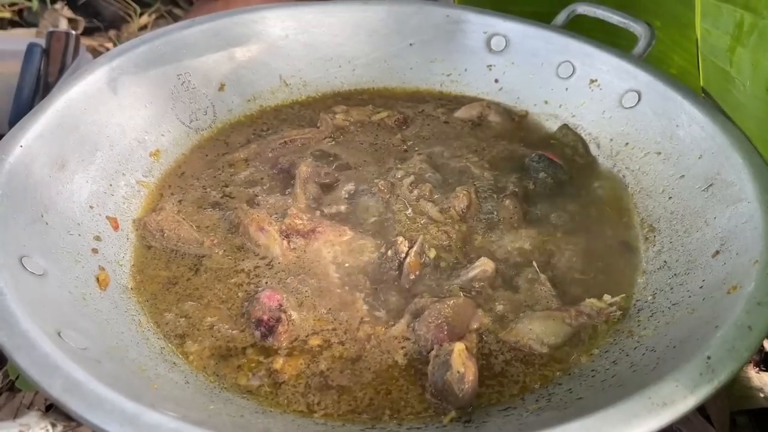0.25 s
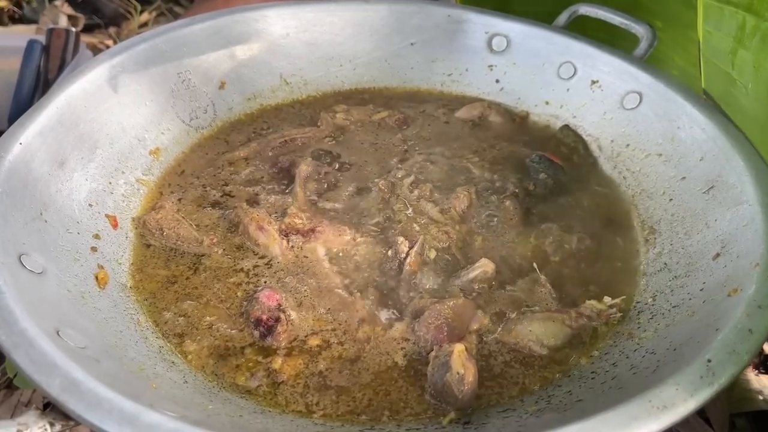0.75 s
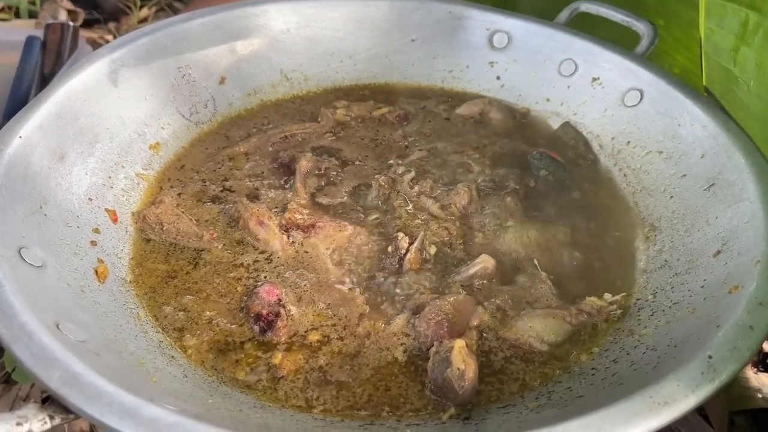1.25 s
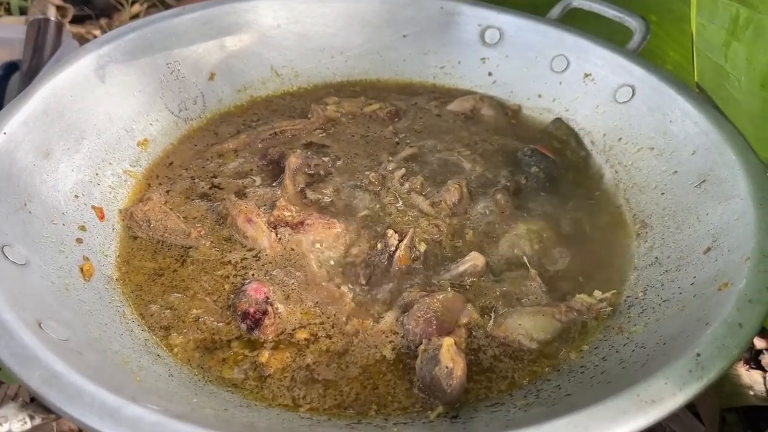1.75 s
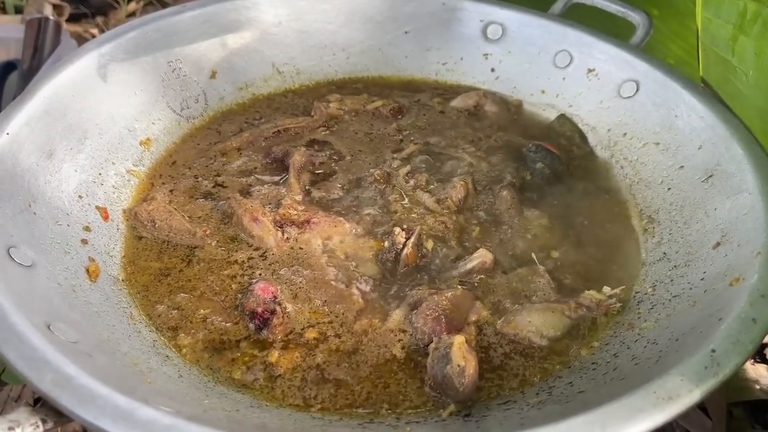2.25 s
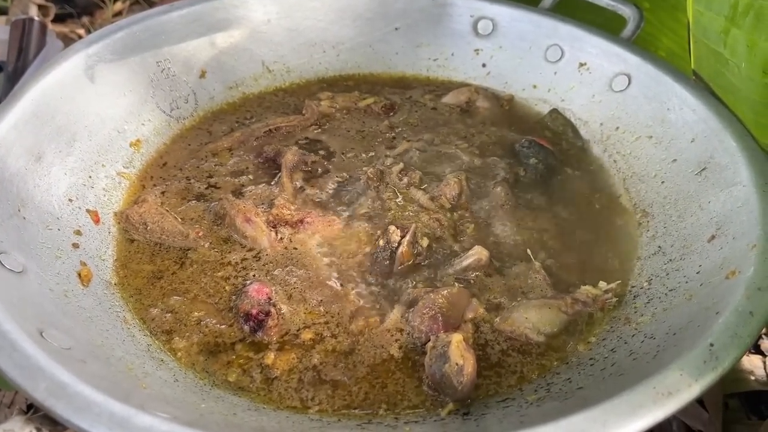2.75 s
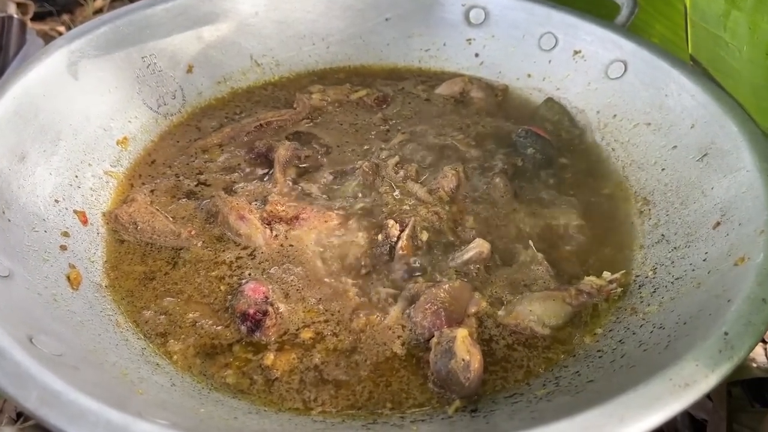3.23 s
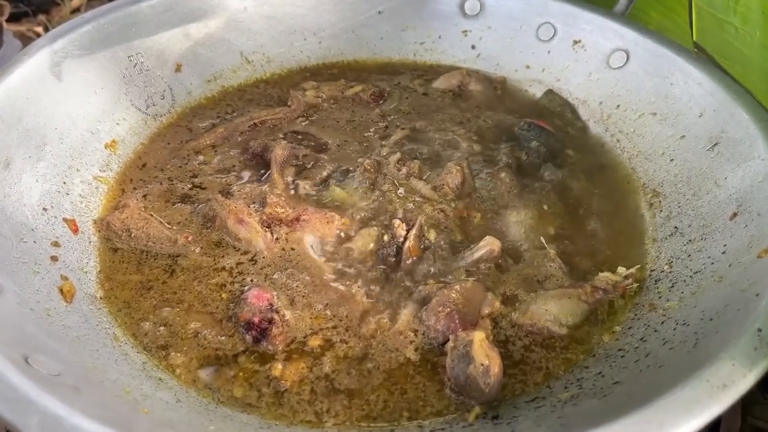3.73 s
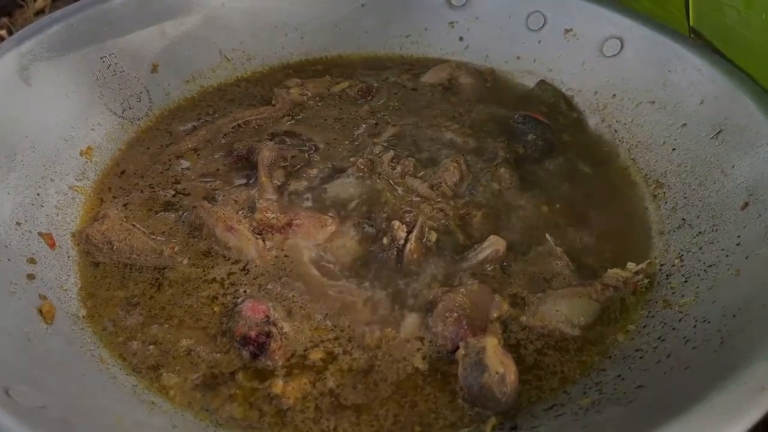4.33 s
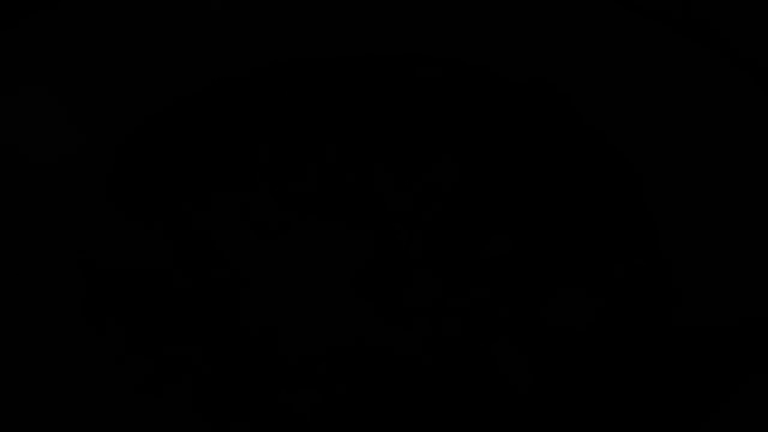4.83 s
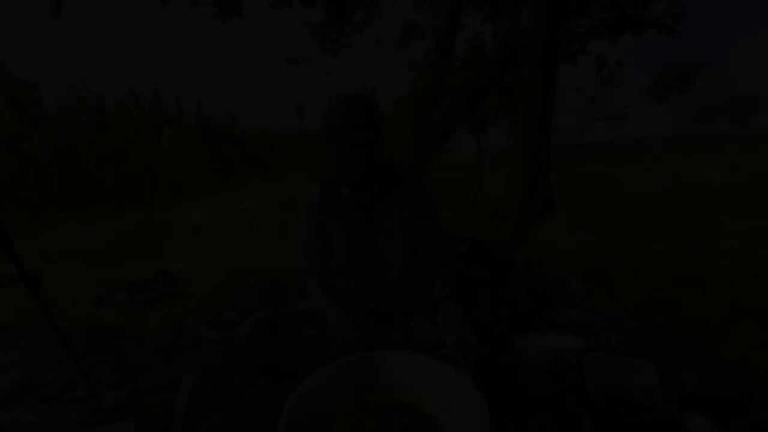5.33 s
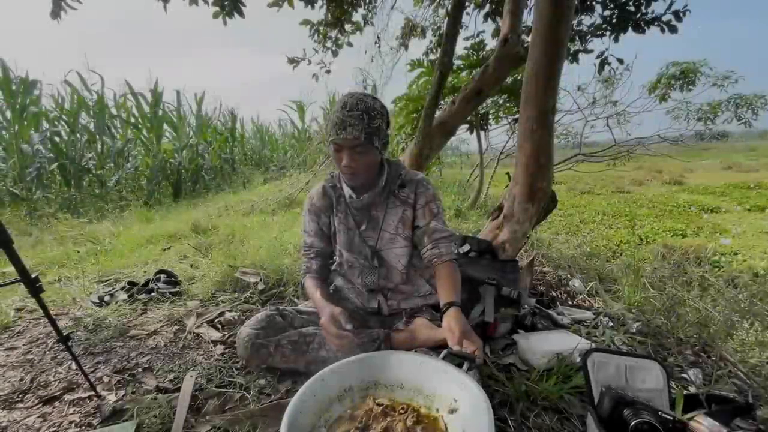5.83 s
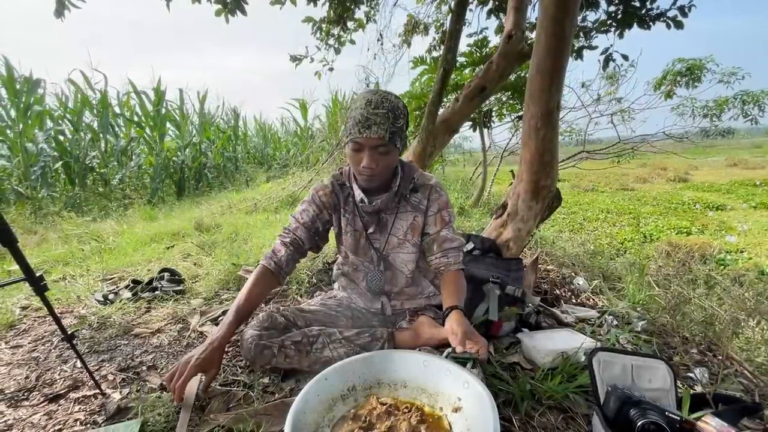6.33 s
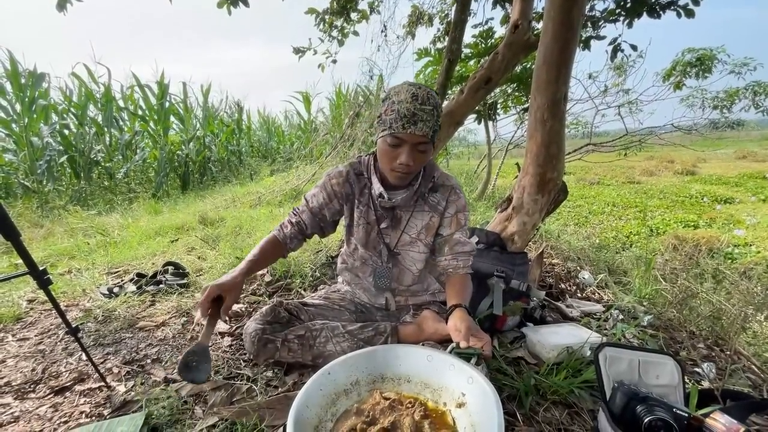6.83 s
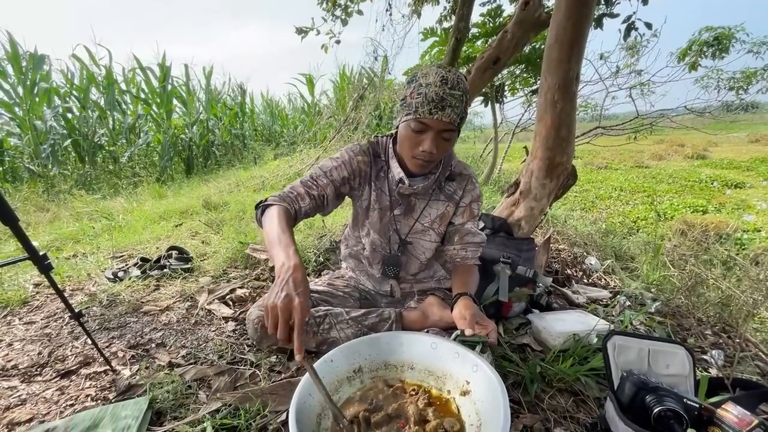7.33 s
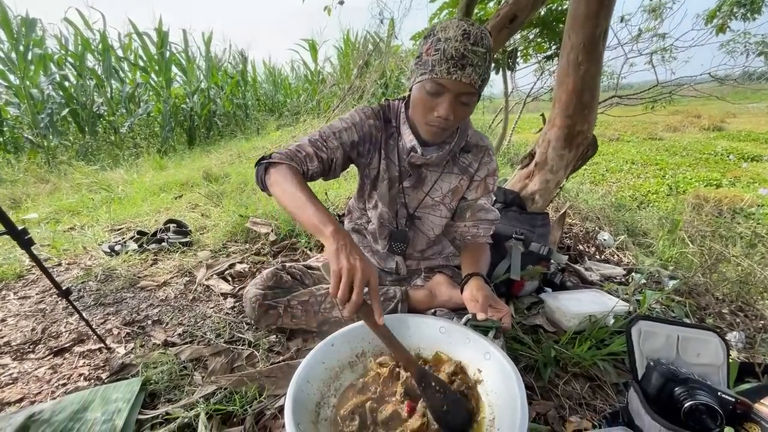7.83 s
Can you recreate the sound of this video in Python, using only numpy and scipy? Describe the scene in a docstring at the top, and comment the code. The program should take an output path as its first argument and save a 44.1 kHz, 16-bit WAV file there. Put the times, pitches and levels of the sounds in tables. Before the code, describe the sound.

Close bubbling and fat spitting in a wok over hissing gas with insects buzzing, fading to a wider simmer, spatula knocks and wet stirring.

```python
"""Close above a metal wok on a gas burner at a field edge: a steam pocket hums in throbs under the meat, fat
spits as short rising tones with torn noise, bubbles burst, and insects buzz in the grass (narrow noise, wing pulses).
At 1.4 s one big bubble thumps the pan in jolts that ring its modes. From 4 to 6 s the close place fades over to one
further off: a lower flame, and simmering made of ringing grains over a soft wash. At 7.25 s a spatula knocks the
wok (damped modes and clicks), then stirs: wet grains and resonant scraping. A lower insect rasps meanwhile."""
import sys
import numpy as np
from scipy import signal
from scipy.fft import rfft, irfft, next_fast_len
from scipy.io import wavfile

SR = 44100
rng = np.random.default_rng(int(sys.argv[2]) if len(sys.argv) > 2 else 0)


def wrap_up_sound(samples):
    """Save the sound to the file named by the first command line argument, as 16-bit audio."""
    columns = np.atleast_2d(samples).T
    # keep every value between -1 and 1, then stretch to whole-number steps
    tamed = np.clip(columns, -1, 1)
    steps = np.round(tamed * 32767).astype(np.int16)
    wavfile.write(sys.argv[1], SR, steps)


N = 356283
TIME = np.arange(N) / SR
SIZE = next_fast_len(N + 8192)
FREQS = np.maximum(np.arange(SIZE // 2 + 1) * SR / SIZE, 1)

# All levels below are relative: the sources add their own balance and pan.
# far insect chorus: (frequency [Hz], level [dB per Hz])
CHORUS_SPECTRUM = [(7200, -105), (8400, -93), (9150, -73), (9500, -81.5), (10050, -70.5), (10600, -80.5),
                   (11300, -81.5), (12000, -103.5), (12700, -118)]
# near insect, about one call a second: (time of breaking off [s], level [dB])
NEAR_CALLS = [(.91, -43.5), (2.08, -42.5), (3.2, -43.5), (4.34, -43), (5.3, -47.5), (6.41, -40),
              (7.59, -39), (8.6, -38)]
# second, lower insect: (middle time [s], length [s])
RASP_TIMES = [(7.357, 0.33), (7.66, 0.26), (7.98, 0.34)]
# smooth hiss of gas and steam: (frequency [Hz], level [dB per Hz])
HISS_SPECTRUM = [(500, -100), (1100, -92.5), (1550, -89), (2100, -92), (2850, -85.5), (3800, -93.5),
                 (5500, -92), (7000, -91.5), (9000, -91), (11800, -99), (12600, -118), (15700, -138)]
# flame and the wash of the boil, at the close and the far place: (frequency [Hz], level [dB per Hz])
CLOSE_FLAME_SPECTRUM = [(20, -104), (45, -65), (70, -58), (110, -60.5), (190, -69), (320, -73),
                        (520, -81.5), (900, -99), (2000, -104)]
FAR_FLAME_SPECTRUM = [(20, -88), (35, -65.5), (54, -52.5), (100, -59.5), (135, -72), (260, -72), (420, -82),
                      (900, -85), (2000, -124.5)]
# small bubbles, heard from further off: (frequency [Hz], level [dB per Hz])
SIMMER_SPECTRUM = [(300, -94), (480, -78), (720, -73.5), (1250, -82), (1650, -75), (2150, -81.5),
                   (2900, -77), (3600, -76), (5400, -76.5), (6600, -100), (8000, -77.5), (12000, -114)]
# frying fat, close: (frequency [Hz], level [dB per Hz])
SIZZLE_SPECTRUM = [(1500, -102), (3500, -93), (5200, -89.5), (6800, -87), (8000, -82), (9400, -81.5),
                   (11200, -80), (12300, -85.5), (13200, -101), (15700, -99)]
# steam pocket, throbbing faster as it shrinks and slower as it refills:
# (time [s], throb rate [per s], level [dB], pitch [Hz])
POCKET_THROBS = [(0.0, 15.35, -26.6, 108), (0.32, 26.16, -28.0, 132), (0.42, 29.11, -33.4, 138),
                 (0.62, 22.93, -29.5, 114), (1.0, 22.88, -30.1, 128), (1.33, 20.34, -29.7, 122),
                 (1.55, 12.25, -41.0, 115), (1.72, 10.72, -27.2, 107), (2.06, 15.6, -28.0, 112),
                 (2.42, 19.91, -24.6, 117), (2.68, 25.87, -26.8, 133), (2.77, 24.75, -31.0, 134),
                 (2.92, 21.23, -30.0, 116), (3.08, 21.46, -25.3, 124), (3.3, 27.84, -26.2, 135),
                 (3.55, 29.19, -28.2, 136), (3.75, 32.67, -31.3, 141), (3.88, 28.13, -28.4, 118),
                 (4.06, 19.72, -35.0, 110), (4.2, 20.18, -28.7, 123), (4.54, 17.24, -29.0, 124),
                 (4.72, 15.63, -41.0, 124)]
# droplets of fat spitting: (time [s], level [dB], pitch [Hz], top of the tearing sound [Hz])
FAT_SPITS = [(.020, -31, 8700, 10000), (.152, -36, 7400, 9400), (.357, -26.5, 8040, 10600),
             (.590, -17, 9900, 11700), (.707, -25, 8200, 10200), (.970, -32, 8500, 9700),
             (1.068, -28, 8500, 10000), (1.200, -31, 7700, 9400), (1.568, -25, 8900, 10300),
             (1.598, -29, 7360, 9600), (1.652, -33, 7170, 9400), (1.854, -30, 7960, 10200),
             (2.111, -30.5, 8400, 10200), (2.434, -28.5, 7550, 9800), (2.527, -27.5, 7800, 9550),
             (2.707, -26, 8500, 9700), (2.783, -22, 9300, 11000), (3.021, -31, 8300, 9900),
             (3.173, -22.5, 8900, 10600), (3.217, -31, 7800, 9500), (3.511, -27, 7900, 9800),
             (3.529, -30, 6500, 9400), (3.620, -30, 7360, 10000), (3.978, -30, 9400, 10400),
             (4.243, -20, 8600, 10400), (4.3765, -26, 8800, 10200), (4.777, -29, 8060, 10000),
             (4.844, -31, 8800, 10000), (5.034, -31.5, 8400, 9700), (5.064, -28.5, 8350, 9300),
             (5.307, -31, 8050, 9100)]
# bubbles bursting at the surface: (time [s], level [dB], pitch [Hz], top of the tearing sound [Hz])
SURFACE_BUBBLES = [(.200, -36, 910, 2000), (.212, -31.5, 1490, 2600), (.287, -39, 795, 2000),
                   (.368, -37.5, 940, 1600), (.476, -23.5, 496, 2900), (.603, -28.5, 764, 2600),
                   (.702, -32.5, 2920, 4470), (.861, -28.5, 620, 1100), (.875, -25.5, 1570, 3420),
                   (.897, -28.5, 2720, 7000), (.922, -41.5, 620, 1000), (.947, -42, 540, 900),
                   (.991, -27.5, 3100, 3780), (1.099, -40, 614, 1300), (1.113, -31.5, 530, 1100),
                   (1.311, -30, 541, 1700), (1.322, -30, 616, 1300), (1.338, -31, 1050, 1600),
                   (1.356, -33, 700, 1700), (1.4252, -12.5, 2740, 3220), (1.613, -31.5, 700, 1800),
                   (1.641, -30, 2760, 4200), (1.724, -36.5, 2420, 3400), (1.851, -32, 517, 2400),
                   (1.929, -33, 2380, 3100), (2.004, -38.5, 780, 1900), (2.190, -37, 517, 1200),
                   (2.408, -33, 517, 1500), (2.826, -40, 520, 1200), (2.907, -29, 527, 1690),
                   (3.118, -37, 650, 1900), (3.218, -31, 520, 1800), (3.420, -37.5, 756, 2300),
                   (3.493, -27, 2620, 3590), (3.815, -37.5, 565, 1500), (3.943, -29.5, 540, 2400),
                   (3.966, -24, 503, 2600), (3.968, -33, 1100, 2200), (4.074, -32, 607, 2300),
                   (4.429, -31, 550, 2200), (4.519, -32, 3960, 4800), (5.085, -31, 480, 900),
                   (5.243, -30.5, 1570, 2190), (5.325, -29, 860, 1990), (5.378, -37, 754, 1700),
                   (5.482, -33, 860, 2500), (5.599, -37, 888, 1900), (5.644, -26.5, 1630, 2720),
                   (5.701, -28.5, 930, 2800), (5.768, -29.5, 527, 3000), (5.874, -26, 1740, 3300),
                   (5.875, -22, 895, 2000), (5.906, -28.5, 2750, 3500), (5.924, -29, 3700, 6000),
                   (6.000, -34, 640, 2200), (6.043, -35, 711, 1400), (6.091, -33, 1720, 2600),
                   (6.117, -40, 700, 1600), (6.129, -27.5, 910, 4200), (6.166, -35, 716, 2000),
                   (6.190, -31.5, 685, 1600), (6.218, -32, 840, 1500), (6.234, -29.5, 805, 1700),
                   (6.279, -29, 1630, 3000), (6.358, -27, 690, 2800), (6.381, -33, 912, 1600),
                   (6.408, -31, 1840, 2390), (6.491, -29.5, 655, 1100), (6.510, -29, 834, 2200),
                   (6.541, -27.5, 896, 3000), (6.552, -26, 1650, 2620), (6.604, -35, 1750, 2400),
                   (6.655, -36, 635, 2200), (6.733, -26.5, 540, 3200), (6.749, -26.5, 850, 2920),
                   (6.795, -34, 710, 1500), (6.834, -33, 840, 2500), (6.857, -36, 800, 2400),
                   (6.957, -28, 786, 1500), (6.969, -28.5, 1000, 5030), (7.0885, -19, 2900, 3200),
                   (7.109, -34, 1930, 2500), (7.145, -27.5, 1800, 2330), (7.173, -31, 1560, 2600),
                   (7.208, -26.5, 750, 1400), (7.317, -25.5, 550, 2000), (7.319, -25, 1440, 1900),
                   (7.418, -28.5, 590, 3000), (7.438, -29, 1550, 2300), (7.552, -30.5, 1000, 2000),
                   (7.628, -27.5, 960, 1600), (7.654, -31, 1000, 2200), (7.661, -29, 2360, 2700),
                   (7.673, -35, 1600, 2160), (7.708, -37, 880, 2000), (7.762, -28, 1110, 2000),
                   (7.788, -26, 1800, 2300), (7.802, -29, 1780, 2300), (7.833, -32, 900, 2400),
                   (7.880, -23, 890, 1150), (7.929, -33.5, 750, 2000)]
# big steam bubble collapsing against the pan in jolts:
# (time [s], body level [dB], crack level [dB], crack top [Hz], left over right [dB], slap level [dB])
COLLAPSE_JOLTS = [(1.4252, -15.5, -16, 7000, 15, -19), (1.4308, -6.5, -8.5, 11500, 4, -13),
                  (1.4430, -13.5, -16.5, 8200, 9, -21), (1.465, -37, -31, 6000, 4, -26),
                  (1.5238, -24, -24, 5870, 7.5, -32)]
# modes of the filled wok, struck from within: (frequency [Hz], level [dB], 60 dB decay time [s])
WOK_MODES = [(114.5, -8.5, 0.22), (176, -15, 0.12), (216, -10, 0.18), (265.6, -4, 0.17), (330, 3, 0.043),
             (449, -0.5, 0.085), (531, -7, 0.11), (622, -12.5, 0.093), (680, -25, 0.051), (812, -12, 0.067),
             (920, -15, 0.06), (1020, -20, 0.032), (1210, -20.5, 0.11), (1440, -33, .06), (1850, -23, 0.07),
             (2075, -18, 0.075), (2310, -21, 0.07), (2600, -14, .045), (3310, -38, 0.092),
             (4200, -37, 0.09), (4610, -33, .1), (5560, -34, 0.12), (5750, -36, .13), (6900, -33, .13)]
# two knocks on the side of the wok, each with a soft bounce:
# (time [s], level [dB], frequency above which the contact dulls [Hz])
SPATULA_KNOCKS = [(7.2496, -18, 4350), (7.2522, -22, 1200), (7.3723, -24, 1500), (7.3748, -22.5, 480)]
# spatula and wall ringing together: (frequency [Hz], level [dB], 60 dB decay time [s])
SPATULA_MODES = [(209, -12, 0.072), (397, -0.5, 0.044), (407, -19, 0.23), (476, -3, 0.046), (763, 1, 0.027),
                 (832, -16, 0.12), (852, -8, 0.016), (910, -2, 0.037), (1050, -12, 0.02), (1342, -34, 0.11),
                 (1615, -17, 0.12), (1750, -8, 0.048), (1815, -10.5, 0.08), (2460, 0.5, 0.032),
                 (2830, -3.5, 0.026), (4540, -2.5, 0.051), (4830, 1, 0.039), (5500, 7, 0.022)]
# wet meat pushed aside: (frequency [Hz], level [dB per Hz])
SLOSH_SPECTRUM = [(250, -67), (600, -69), (950, -76), (1300, -92), (1780, -68.5), (2100, -79), (3000, -77),
                  (4600, -81), (6800, -82), (8100, -89), (9500, -90), (12000, -106)]
# resonances of the scraping blade: (frequency [Hz], width [Hz], level [dB])
BLADE_RESONANCES = [(1780, 80, 6.5), (2440, 82, 1), (3100, 480, 1), (4400, 760, 5), (5400, 400, -4),
                    (6300, 770, -4)]
# strokes of the spatula:
# (middle time [s], length [s], slosh level [dB], scrape level [dB], top of the scrape [Hz])
STIR_STROKES = [(7.413, 0.6, -7, -47.5, 6000), (7.705, 0.07, -19, -37.5, 5600),
                (7.731, 0.027, -14, -40.5, 7500), (7.779, 0.015, -3, -36, 5200),
                (7.802, 0.038, -21, -41, 5400), (7.851, 0.064, -10, -37, 3900),
                (7.944, 0.023, -3, -46, 3000), (7.968, 0.053, -7, -39.5, 4800),
                (7.85, 0.74, -7, -47.5, 7000)]
# likeness of diffuse sound at the two microphone ports: (frequency [Hz], correlation [-1 to 1])
PORT_LIKENESS = [(60, 0.97), (300, 0.92), (900, 0.5), (2000, 0.87), (3200, 0.18), (5200, 0.08),
                 (7000, 0.092), (8500, 0.94), (12000, 1)]
# lag of the left microphone port: (frequency [Hz], phase lag [rad])
LEFT_PORT_LAG = [(0, 0), (8500, 0), (10300, np.pi), (12100, 2 * np.pi), (13700, 3 * np.pi),
                 (15600, 4 * np.pi)]

INSECT_HZ, INSECT_WIDTH_HZ, WINGBEAT_HZ = 9456, 240, 87.9
SWELL_S, HOLD_S, BREAK_S, SWELL_DB = 0.42, 0.37, 0.02, 7  # a call rises by SWELL_DB, holds, then stops
RASP_HZ, RASP_WIDTH_HZ, RASP_DB = 7800, 990, -47.5
CHIRP_HZ = 2750
SPLASH_AT_HZ = 1000  # pitch at which a splash lasts its given time; higher bubbles splash more briefly
SPIT_T60_S = 0.008
STROKE_EDGE_DB = 15  # how much quieter the two ends of a swell are than its middle
CLOSE_DB, CLOSE_OUT_START_S, CLOSE_OUT_END_S = -0.18, 4.6, 5.43
FAR_DB, FAR_IN_START_S, FAR_IN_END_S = 0.5, 4.01, 6.03
CUTOFF_HZ = 15850


def from_db(db):
    """Decibels to gain."""
    return 10 ** (np.asarray(db) / 20)


def rms_one(x):
    """Scale to rms 1."""
    return x / np.sqrt(np.mean(x ** 2) + 1e-20)


def in_time(rows):
    """Each column of a curve at every sample."""
    s, *columns = np.transpose(rows)
    return [np.interp(TIME, s, column) for column in columns]


def at_hz(points, hz):
    """Read a table on a log-frequency axis."""
    table_hz, values = np.transpose(points)
    return np.interp(np.log(hz), np.log(table_hz), values)


def panned(pan_db):
    """Left and right gains for a level difference; positive leans left."""
    return from_db(np.array([[.5], [-.5]]) * pan_db)


def shaped(x, gain):
    """Filter by a gain for each frequency."""
    return irfft(rfft(x, SIZE) * gain, SIZE)[..., :N]


def coloured(x, spectrum):
    """Give a white sound of rms 1 a spectrum in dB per Hz."""
    return shaped(x, from_db(at_hz(spectrum, FREQS)) * np.sqrt(SR / 2))


def band(x, low_hz, high_hz):
    """A gentle causal band-pass."""
    edges = [low_hz, min(high_hz, SR / 2 - 2000)]
    return signal.sosfilt(signal.butter(2, edges, "band", fs=SR, output="sos"), x)


def below(x, top_hz):
    """A steep low-pass."""
    return shaped(x, 1 / np.sqrt(1 + (FREQS / top_hz) ** 10))


def resonate(x, hz, width_hz):
    """A resonance with gain 1 on top."""
    r = np.exp(-np.pi * width_hz / SR)
    feedback = [1, -2 * r * np.cos(2 * np.pi * hz / SR), r * r]
    return signal.lfilter(np.array([1, 0, -1]) * (1 - r * r) / 2, feedback, x + 1e-18)


def drift(rate):
    """Slow random curve of rms 1, with the given number of knots per second."""
    knots = rng.standard_normal(int(N / SR * rate) + 2)
    return rms_one(np.interp(TIME * rate, np.arange(len(knots)), knots))


def add(out, s, sound):
    """Mix a stereo sound in at a time."""
    at = int(np.clip(round(s * SR), 0, N - 1))
    out[:, at:at + sound.shape[1]] += sound[:, :N - at]


def right_late(x, lag_s):
    """A source on the left reaches the right port later."""
    return np.array([x[0], shaped(x[1], np.exp(-2j * np.pi * FREQS * lag_s))])


def diffuse():
    """White stereo noise, as alike as the two ports hear it."""
    mid, side = rng.standard_normal((2, N))
    alike = np.clip(at_hz(PORT_LIKENESS, FREQS), -1, 1)
    common = shaped(mid, np.sqrt((1 + alike) / 2))
    return common + shaped(side, np.sqrt((1 - alike) / 2)) * [[1], [-1]]


def short_noise(size, low_hz, high_hz):
    """A short stretch of noise with a gentle lower edge and a steep upper one; rms 1."""
    hz = np.maximum(np.arange(size // 2 + 1) * SR / size, 1)
    edges = np.sqrt((1 + (low_hz / hz) ** 4) * (1 + (hz / high_hz) ** 10))
    return rms_one(irfft(rfft(rng.standard_normal(size)) / edges, size))


def grains(per_s, low_hz, high_hz, width, spread_db, clump_db, scatter, count=16):
    """Tiny clumped bursts, each ringing at one of many pitches from its own spot in the pan; near white, rms 1."""
    chance = per_s * from_db(clump_db * drift(22)) / SR
    born = np.flatnonzero(rng.random(N) < chance)
    size, sign, pitch, spot = rng.random((4, len(born)))
    height = from_db(spread_db * np.minimum(-np.log(1 - size), 4.5)) * np.sign(sign - .5)
    # the spot sets how much later or earlier the burst reaches the right port (scatter in samples)
    born_right = np.clip(born + np.round(scatter * (2 * spot - 1)).astype(int), 0, N - 1)
    out, cover = np.zeros((2, N)), 1e-9
    for k, hz in enumerate(np.geomspace(low_hz, high_hz, count)):
        mine = (pitch * count).astype(int) == k
        clicks = np.zeros((2, N))
        clicks[0, born[mine]] = height[mine]
        clicks[1, born_right[mine]] = height[mine]
        out += resonate(clicks, hz, width * hz)
        cover = cover + 1 / (1 + ((FREQS / hz - hz / FREQS) / width) ** 2)
    # even out the summed power of the resonances
    return shaped(out, 1 / np.sqrt((cover + 0.04) * np.sum(height ** 2) / count / N))


def modes_ring(modes, t, uneven_db):
    """One decaying sine row for each mode after a blow, with a strength of its own and alternating sign."""
    hz, mode_db, t60 = np.array(modes).T[:, :, None]
    sign = (-1) ** np.arange(len(hz))[:, None]
    strength = from_db(mode_db + rng.normal(0, uneven_db, hz.shape)) * sign
    return strength * np.sin(2 * np.pi * hz * t) * from_db(-60 * t / t60)


def stroke_shape(middle_s, length_s):
    """A rounded swell, 1 in its middle."""
    return from_db(-STROKE_EDGE_DB * np.minimum((2 * (TIME - middle_s) / length_s) ** 2, 20))


def insect_chorus():
    """A steady far chorus: diffuse noise in narrow treble bands."""
    return coloured(diffuse(), CHORUS_SPECTRUM)


def birds(level_db=-67, warble=0.078, count=4):
    """Far birds twitter: thin, broken notes of wavering pitch overlap to a faint murmur."""
    notes = np.zeros(N)
    for _ in range(count):
        hz = CHIRP_HZ * (1 + warble * drift(45))
        notes += np.sin(2 * np.pi * np.cumsum(hz) / SR) * np.maximum(drift(30), 0)
    return from_db(level_db) * rms_one(notes) * panned(9.1)


def call_level():
    """Every call of the near insect swells, holds and breaks off in the same way."""
    level = np.zeros(N)
    for end_s, call_db in NEAR_CALLS:
        still_to_rise = np.maximum(end_s - HOLD_S - TIME, 0) / SWELL_S
        break_off = np.clip(1 - (TIME - end_s) / BREAK_S, 0, 1)
        level = np.maximum(level, from_db(call_db - SWELL_DB * still_to_rise) * break_off)
    return level


def near_insect(waver=0.0125, jitter=0.00477, sweep_hz=700, stroke_db=1, level_db=-3):
    """A narrow buzz, and on each wing stroke a pulse that falls in pitch."""
    stroke = np.cumsum(WINGBEAT_HZ * (1 + waver * drift(6.6))) / SR % 1
    hz = INSECT_HZ * (1 + jitter * drift(900)) + sweep_hz * (1 - 2 * stroke)
    tone = np.sin(2 * np.pi * np.cumsum(hz) / SR)
    pulse = rms_one(tone * np.sin(np.pi * stroke) ** 4 * from_db(0.72 * drift(90)))
    narrow = resonate(rng.standard_normal(N), INSECT_HZ, INSECT_WIDTH_HZ)
    buzz = rms_one(resonate(narrow, INSECT_HZ, 900))
    return (buzz + from_db(stroke_db) * pulse) * from_db(level_db) * call_level() * panned(-1.2)


def rasping_insect():
    """Short swells of a narrow, breathy rasp: noise through two equal resonances."""
    once = resonate(diffuse(), RASP_HZ, RASP_WIDTH_HZ)
    rasp = rms_one(resonate(once, RASP_HZ, RASP_WIDTH_HZ))
    return rasp * from_db(RASP_DB) * sum(stroke_shape(s, length_s) for s, length_s in RASP_TIMES)


def hiss():
    """Gas and steam hiss smoothly throughout: shaped diffuse noise."""
    return coloured(diffuse(), HISS_SPECTRUM) * panned(2.2)


def flame(spectrum, flutter_db, flutter_rate, pan_db):
    """Flame and the wash of the boil: low diffuse noise with a fluttering level."""
    return coloured(diffuse(), spectrum) * from_db(flutter_db * drift(flutter_rate)) * panned(pan_db)


def simmer(wash_db=-10):
    """The thick stew patters with small ringing bubbles over a soft noise wash of finer ones."""
    patter = below(grains(per_s=230, low_hz=506, high_hz=3200, width=0.19, spread_db=0.9,
                          clump_db=3.0, scatter=2.5, count=16), 3170)
    both = coloured(patter * from_db(-4.5) + diffuse() * from_db(wash_db), SIMMER_SPECTRUM)
    return right_late(both, lag_s=.00009) * panned(0.8)


def sizzle():
    """Frying fat: dense clumps of high ringing grains."""
    fat = grains(per_s=1200, low_hz=3390, high_hz=11000, width=0.08, spread_db=5.5,
                 clump_db=4.0, scatter=0.59, count=10)
    return coloured(fat, SIZZLE_SPECTRUM) * from_db(-0.9) * panned(1.7)


def soft_bubbles():
    """A few soft bubbles: sparse, briefly ringing grains."""
    blips = grains(per_s=52, low_hz=496, high_hz=3400, width=0.31, spread_db=2.5,
                   clump_db=5.0, scatter=1.1, count=7)
    return band(blips, 450, 4400) * from_db(-51.5) * panned(2.1)


def steam_pocket(length_s=0.0081, uneven_db=1.0, waver=0.008, level_db=0.5):
    """The pocket hums, swelling and dying with each throb; its pitch rises as it shrinks."""
    per_s, peak_db, hz = in_time(POCKET_THROBS)
    swell = np.zeros(N + SR)
    t = np.arange(-1500, 1500) / SR
    beats = np.flatnonzero(np.diff(np.floor(np.cumsum(per_s) / SR + .5)))
    for at, size in zip(beats, rng.standard_normal(len(beats))):
        beat_db = peak_db[at] + level_db + uneven_db * size
        swell[at:at + len(t)] += from_db(beat_db) * np.exp(-.5 * (t / length_s) ** 2)
    hum = np.sin(2 * np.pi * np.cumsum(hz * (1 + waver * drift(40))) / SR)
    centred = swell[len(t) // 2:][:N]
    return right_late(hum * centred * panned(2.5), lag_s=0.00066)


def bursts(rows, cycles, glide, tone_db, splash_db, splash_t60, splash_width_hz, tear_db, tear_t60,
           open_cycles, pan_db):
    """A film tears with a short splash through the opening cavity, which rings some cycles, rising in pitch."""
    out, t = np.zeros((2, N)), np.arange(SR // 16) / SR
    for s, peak_db, hz, top_hz in rows:
        age = t * hz / cycles  # 1 when the tone has fallen by 60 dB
        opening = 1 - np.exp(-t * hz / open_cycles)
        rising_hz = hz * (1 + glide * np.minimum(age, 1))
        tone = np.sin(2 * np.pi * np.cumsum(rising_hz) / SR) * from_db(tone_db - 60 * age)
        stretch = 1 + splash_width_hz / (2 * hz)
        splash_fall_db = -60 * t / splash_t60 * np.sqrt(hz / SPLASH_AT_HZ)
        splash = short_noise(len(t), hz / stretch, hz * stretch) * from_db(splash_db + splash_fall_db)
        tear = short_noise(len(t), hz * 0.94, top_hz) * from_db(tear_db - 60 * t / tear_t60)
        burst = (tear + tone + splash) * opening
        add(out, s, from_db(peak_db) * burst * panned(pan_db + rng.normal(0, 3.6)))
    return out


def fat_spits():
    """Droplets of fat burst high and very briefly."""
    return bursts(FAT_SPITS, cycles=38, glide=.03, tone_db=4.5, splash_db=-10.5, splash_t60=2 * SPIT_T60_S,
                  splash_width_hz=2000, tear_db=-6.0, tear_t60=SPIT_T60_S, open_cycles=1.2, pan_db=2.5)


def surface_bubbles():
    """Bubbles burst at the surface, each with a tone, a splash and a tear."""
    return bursts(SURFACE_BUBBLES, cycles=12.2, glide=0.035, tone_db=-0.5, splash_db=-12.5, splash_t60=0.035,
                  splash_width_hz=550, tear_db=-7.5, tear_t60=0.027, open_cycles=.55, pan_db=3.5)


def thump(ring_db=-3, crack_db=-3, crack_t60=0.0063, tail_db=-25, tail_t60=0.16, slap_t60=0.058,
          low_pan_db=0.0, high_pan_db=10.0):
    """Each jolt cracks wetly, sprays, slaps liquid and rings the pan; its higher modes lean to the left."""
    out, t = np.zeros((2, N)), np.arange(SR // 3) / SR
    mode_hz = np.array(WOK_MODES)[:, 0]
    mode_pans = panned(at_hz([(380, low_pan_db), (900, high_pan_db)], mode_hz))
    spray = from_db(-60 * t / crack_t60) + from_db(tail_db - 60 * t / tail_t60)
    for s, body_db, snap_db, top_hz, pan_db, slap_db in COLLAPSE_JOLTS:
        body = mode_pans @ modes_ring(WOK_MODES, t, uneven_db=1.0)
        mid, side = (short_noise(len(t), 350, top_hz) for _ in range(2))
        crack = (mid + 1.1 * side * [[1], [-1]]) * spray
        slap = short_noise(len(t), 330, 930) * from_db(slap_db - 3.0 - 60 * t / slap_t60)
        wet = from_db(snap_db + crack_db) * crack + slap
        add(out, s, from_db(body_db + ring_db) * body + wet * panned(pan_db))
    return right_late(out, lag_s=0.00022)


def knocks(click_db=-8, click_t60=0.026):
    """Each touch clicks and rings the wall; a softer contact leaves the high modes quiet."""
    out, t = np.zeros((2, N)), np.arange(SR // 3) / SR
    for s, level_db, soft_hz in SPATULA_KNOCKS:
        softness = 1 / (1 + (np.array(SPATULA_MODES)[:, :1] / soft_hz) ** 2)
        wall = np.sum(softness * modes_ring(SPATULA_MODES, t, uneven_db=3.0), axis=0)
        noise = rms_one(band(rng.standard_normal(len(t)), 400, soft_hz))
        click = noise * from_db(click_db - 60 * t / click_t60)
        add(out, s, from_db(level_db) * (wall + click) * panned(2.8))
    return out


def wet_meat():
    """The pushed meat sloshes in clumps of small ringing bursts."""
    wet = grains(per_s=780, low_hz=409, high_hz=5370, width=0.12, spread_db=2.0,
                 clump_db=4.5, scatter=3.9, count=16)
    return coloured(band(wet, 200, 5700), SLOSH_SPECTRUM)


def scraping_blade():
    """The blade catches and slips over the metal: uneven noise excites its resonances."""
    slips = diffuse() * from_db(1.3 * drift(220))
    return rms_one(sum(from_db(level_db) * resonate(slips, hz, width_hz)
                       for hz, width_hz, level_db in BLADE_RESONANCES))


def stirring():
    """Each stroke swells and dies away in slosh and scrape, brighter on some strokes."""
    slosh, blade = wet_meat(), scraping_blade()
    strokes = np.zeros((2, N))
    for s, length_s, slosh_db, scrape_db, top_hz in STIR_STROKES:
        stroke = from_db(slosh_db) * slosh + from_db(scrape_db) * below(blade, top_hz)
        strokes += stroke * stroke_shape(s, length_s)
    return strokes * panned(0.81)


def close_place():
    """Just above the pan: flame, sizzle, soft bubbles and the steam pocket, with birds far behind."""
    fire = flame(CLOSE_FLAME_SPECTRUM, flutter_db=1.13, flutter_rate=24.89, pan_db=1.0)
    return birds() + fire + sizzle() + soft_bubbles() + steam_pocket()


def far_place():
    """Further off: the flame flutters lower and the stew simmers."""
    return flame(FAR_FLAME_SPECTRUM, flutter_db=1.7, flutter_rate=13, pan_db=0.69) + simmer()


def scene():
    """The two listening places fade into each other; the other sources keep their own levels."""
    close = from_db(CLOSE_DB) * np.interp(TIME, [CLOSE_OUT_START_S, CLOSE_OUT_END_S], [1, 0])
    far = from_db(FAR_DB) * np.interp(TIME, [FAR_IN_START_S, FAR_IN_END_S], [0, 1])
    field = insect_chorus() + near_insect() + rasping_insect()
    bed = hiss() + far * far_place() + close * close_place()
    spatula = right_late(knocks() + stirring(), lag_s=.00008)
    return field + bed + fat_spits() + surface_bubbles() + thump() + spatula


def record(dry):
    """The microphone ports fall out of step in the treble, the highest peaks are rounded and the top is cut."""
    lag = np.interp(FREQS, *np.transpose(LEFT_PORT_LAG))
    left = shaped(dry[0], np.exp(-1j * lag))
    both = np.array([left, dry[1]])
    rounded = both / (1 + (both / .95) ** 4) ** .25
    return signal.sosfilt(signal.ellip(10, .1, 80, CUTOFF_HZ, fs=SR, output="sos"), rounded)


dry = scene()
out = record(dry)
wrap_up_sound(out)
```